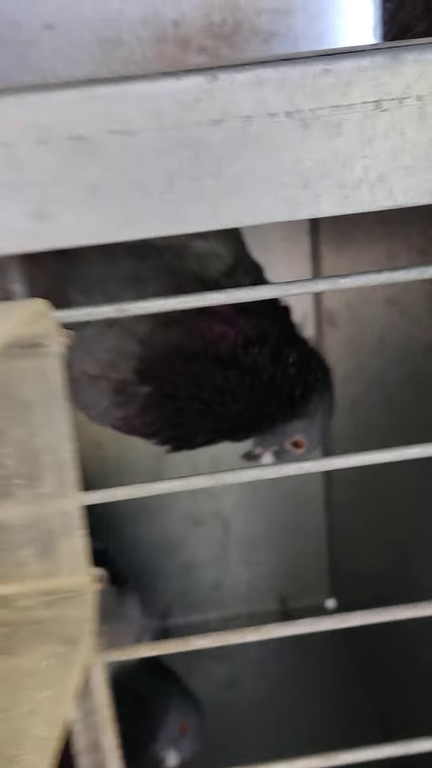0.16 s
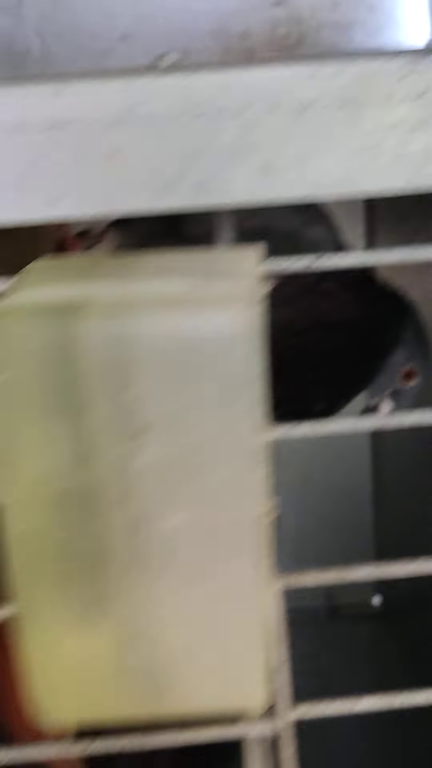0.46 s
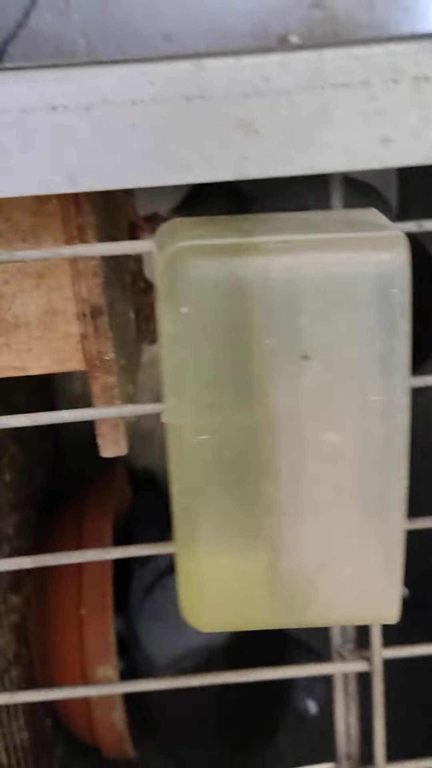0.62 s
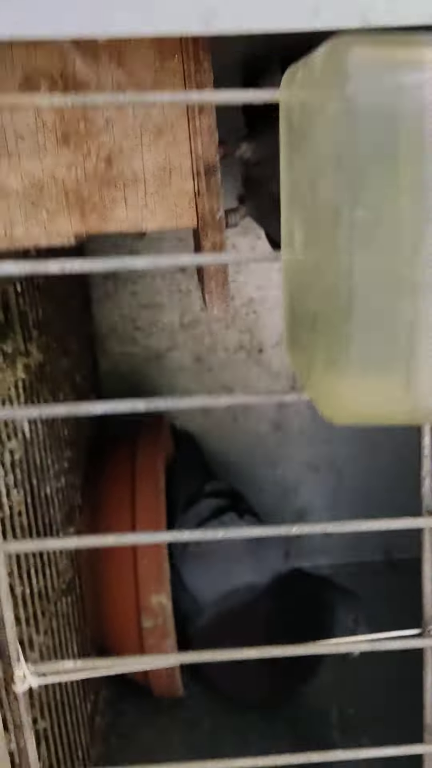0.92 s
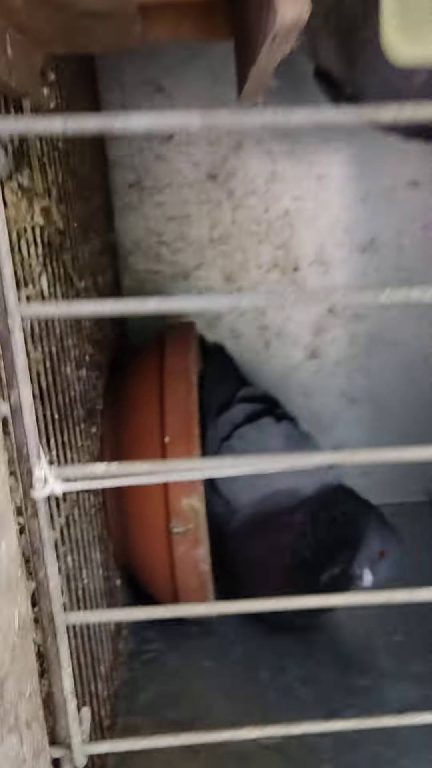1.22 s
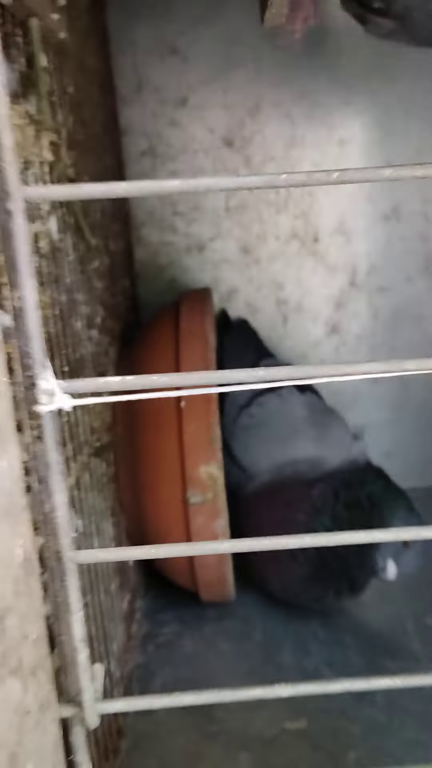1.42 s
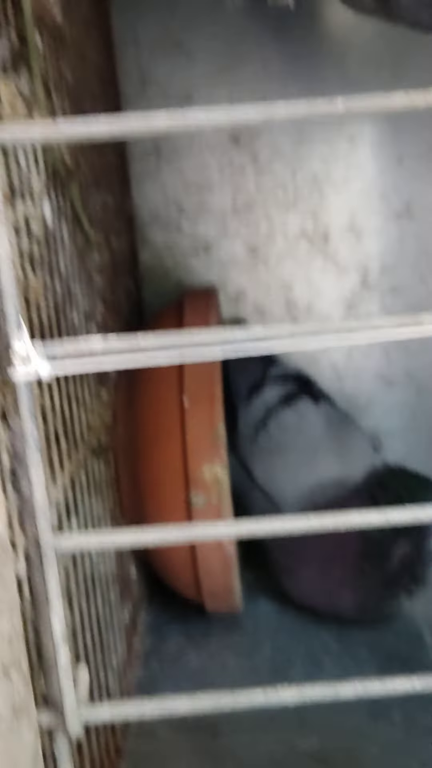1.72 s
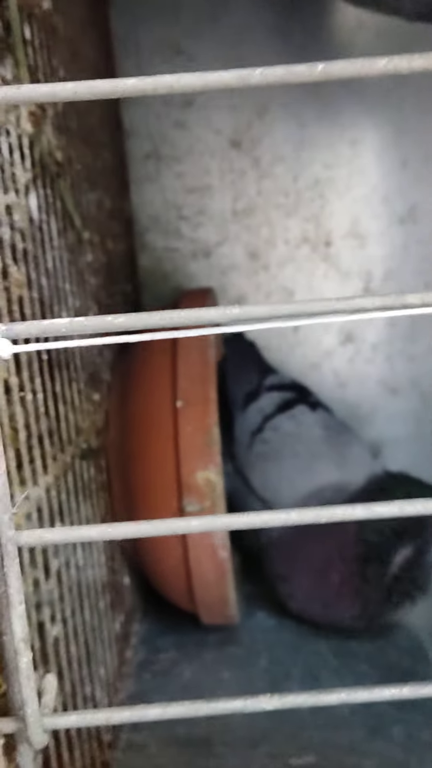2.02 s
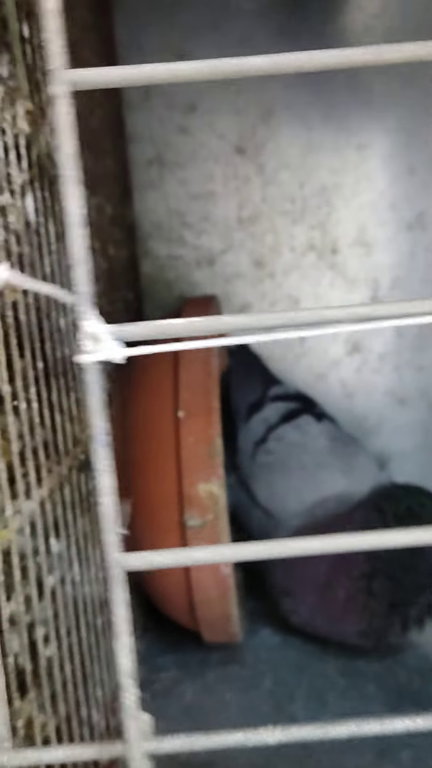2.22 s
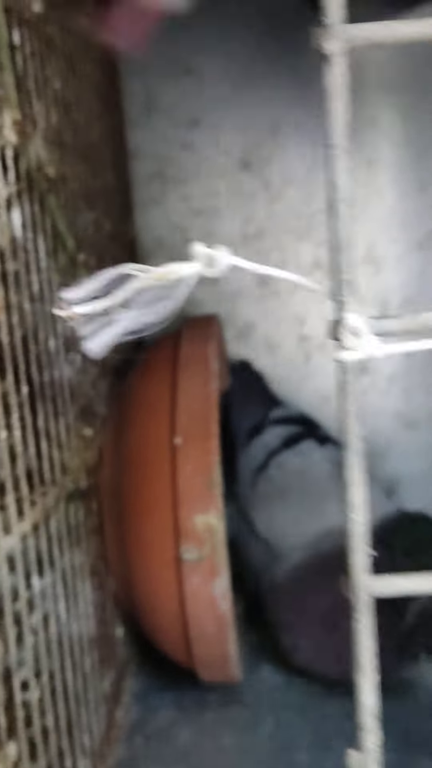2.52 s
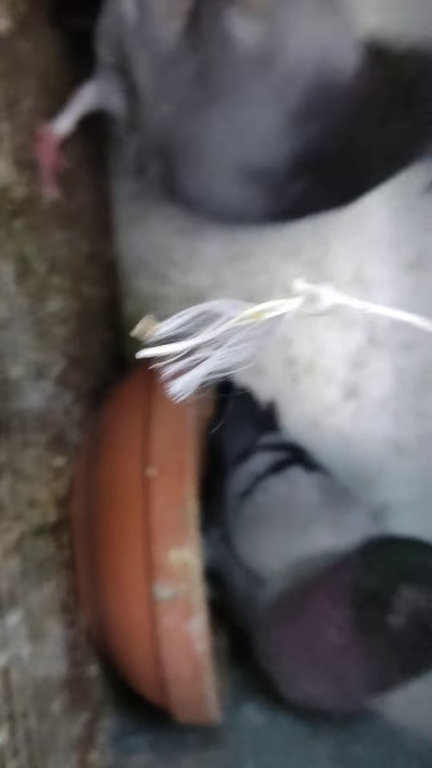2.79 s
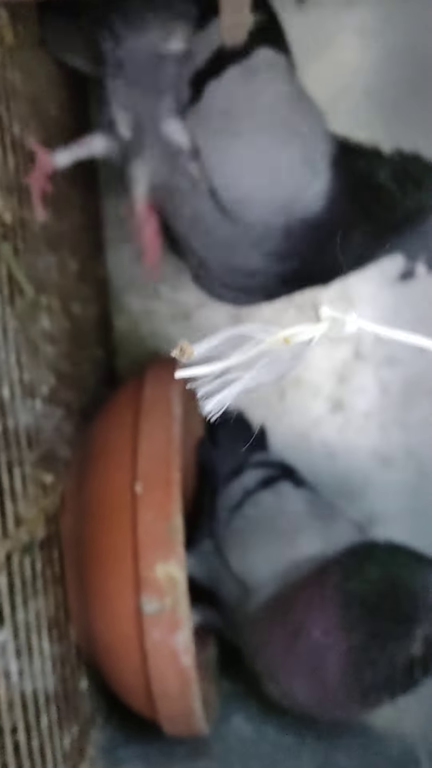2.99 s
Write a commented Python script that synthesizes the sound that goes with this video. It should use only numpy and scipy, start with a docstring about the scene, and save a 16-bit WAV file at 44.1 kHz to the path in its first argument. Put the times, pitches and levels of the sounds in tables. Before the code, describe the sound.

Pigeons coo in low, overlapping, throaty calls for the first 1.5 seconds, with faint falling chick squeaks behind them. From about 1.6 seconds feathers flick and rustle close by, growing louder and busier after 2.3 seconds, with two more short coos. Around 2.7 seconds come quick dry wing claps and a hollow thud on a wooden box, then a sharp tap at 3 seconds.

```python
"""Pigeons coo over each other in a small wooden loft while squabs squeak thinly behind them.
Then one bird flutters close to the wire front: feathers flick and scrape, feet knock,
the nest box booms and the wire rings faintly. Coos are near-sine tones from the swollen crop,
squeaks are falling whistles, feathers are bursts of shaped noise; box and wire resonate."""
import sys
import numpy as np
from scipy import signal
from scipy.fft import rfft, irfft
from scipy.io import wavfile

SR = 44100
rng = np.random.default_rng(int(sys.argv[2]) if len(sys.argv) > 2 else 0)


def wav_out(sig):
    """Save sig, one row per channel (or a flat mono array), as 16-bit PCM at SR to the path in sys.argv[1]."""
    wavfile.write(sys.argv[1], SR, np.round(np.clip(np.atleast_2d(sig).T, -1, 1) * 32767).astype(np.int16))


N = 138915
T = np.arange(N) / SR
BIN_HZ = np.arange(N // 2 + 1) * SR / N

LOFT_T60_S, LOFT_WET_DB = 0.31, -3.5
BOX_T60_S, BOX_WET_DB = 0.028, -3
# feather hiss spectrum (frequency [Hz], level [dB])
FEATHER_HISS = [(2500, -22.5), (4500, -7.5), (6500, -11), (7700, -4.5), (8650, 1.5), (9500, -4),
                (11800, -1.5), (14000, -15.5)]


def undb(db):
    """Decibels to gain."""
    return 10 ** (np.asarray(db) / 20)


def unit(x):
    """Scale to rms 1."""
    return x / np.sqrt(np.mean(x ** 2))


def curve(table, column=1):
    """Gain over time from one dB column."""
    rows = np.array(table)
    return undb(np.interp(T, rows[:, 0], rows[:, column]))


def noise(gain, channels=2):
    """Unit noise whose spectrum follows gain(Hz)."""
    white = rng.standard_normal((channels, N))
    return unit(irfft(rfft(white) * gain(BIN_HZ + 1e-6), N))


def coloured(points, crossfeed=0.065):
    """Partly shared stereo noise shaped by (frequency [Hz], level [dB]) points."""
    hz, db = np.array(points).T
    x = noise(lambda f: undb(np.interp(np.log(f), np.log(hz), db)))
    return unit(x + crossfeed * x[::-1])


def band(hz, half_width_hz):
    """Mono unit noise in one resonance."""
    return noise(lambda f: 1 / (1 + ((f - hz) / half_width_hz) ** 2), channels=1)[0]


def drift(hz):
    """Unit random wander up to a given rate."""
    return noise(lambda f: 1 / (1 + (f / hz) ** 4), channels=1)[0]


def phase_rad(hz):
    """Running phase of a varying frequency."""
    return 2 * np.pi * np.cumsum(hz) / SR


def throb(hz):
    """Unit oscillation whose rate wanders."""
    return unit(np.sin(phase_rad(hz * (1 + 0.2428 * drift(20.03)))))


def burst(start_s, rise_s, decay_s):
    """Linear rise, exponential fall."""
    age_s = T - start_s
    return np.clip(age_s / rise_s, 0, 1) * np.exp(-np.maximum(age_s - rise_s, 0) / decay_s)


def space(x, t60_s, wet_db):
    """Direct sound plus dense reflections after 2 ms, different at each ear."""
    t = T[:SR // 2]
    tail = rng.standard_normal((2, len(t))) * undb(-60 * t / t60_s) * (t > 0.002)
    tail /= np.sqrt(np.sum(tail ** 2, axis=1, keepdims=True))
    reflections = signal.fftconvolve(x, tail, axes=1)[:, :N]
    return (x + undb(wet_db) * reflections) / np.hypot(1, undb(wet_db))


def coos():
    """Near-sine tones from the swollen crop swell, waver and fade; rough ones roll and rasp."""
    # (start [s], length [s], first [Hz], middle [Hz], last [Hz], level [dB], roughness [0-1])
    calls = [(0.0, 0.24, 276, 284.7, 305.5, -40.5, 0), (0.224, .11, 296, 288.4, 247, -36, 0.48),
             (0.349, 0.14, 266, 278.5, 260, -38.5, 0.2), (0.534, .155, 389.8, 373.8, 361.6, -36, 0.21),
             (0.518, 0.17, 290, 277.8, 277, -41.5, 0.26), (0.689, 0.18, 435, 412.6, 395, -43.5, 0.1),
             (0.876, 0.19, 400, 406.3, 445, -40, 0.06), (0.997, 0.19, 445, 415.6, 398, -35, 0.3),
             (1.1, 0.26, 235, 314, 350.4, -34.5, 0.61), (1.228, 0.12, 440, 432.3, 407, -35.5, 0.48),
             (1.304, 0.18, 250, 251.5, 220, -38.5, 0.51), (1.338, 0.22, 385, 378, 298, -34, 0.67),
             (2.027, 0.08, 278, 299, 298, -37.5, 0), (2.347, 0.17, 272, 315.3, 308, -31.5, 0.26)]
    attack_s, release_s = 0.022, 0.018
    rasp_hz, rasp_depth = 104.7, 1.21
    trill_hz, trill_depth = 29, 0.35
    out = np.zeros(N)
    for start_s, length_s, first_hz, middle_hz, last_hz, db, rough in calls:
        u = np.clip((T - start_s) / length_s, 0, 1)
        hz = first_hz * (1 - u) * (1 - 2 * u) + middle_hz * 4 * u * (1 - u) + last_hz * u * (2 * u - 1)
        wobble = (0.02 + 0.12 * rough ** 2) * drift(39.4)
        phase = phase_rad(hz * (1 + wobble))
        voice = np.sin(phase) + undb(-11) * np.sin(2 * phase)
        voice += rough * rasp_depth * throb(rasp_hz) * np.sin(phase)
        voice *= 1 + rough * trill_depth * throb(trill_hz)
        swell = np.clip((T - start_s) / attack_s, 0, 1)
        fade = np.exp(-np.maximum(T - start_s - length_s + release_s, 0) / release_s)
        out += undb(db) * swell * fade * unit(voice)
    throat = signal.butter(5, [195, 590], "bandpass", fs=SR, output="sos")
    return space(signal.sosfilt(throat, out)[None], LOFT_T60_S, LOFT_WET_DB)


def far_coos(birds=8, centre_hz=310.4, level_db=-46.5):
    """Birds deeper in the loft blur into a wavering drone."""
    out = np.zeros(N)
    for _ in range(birds):
        hz = centre_hz * np.exp(0.28 * drift(2))
        out += drift(18.7) * np.sin(phase_rad(hz))
    return undb(level_db) * space(unit(out)[None], LOFT_T60_S, LOFT_WET_DB)


def loft_air(level_db=-47):
    """Soft air noise with a slight flicker."""
    # (frequency [Hz], level [dB])
    spectrum = [(25, -18.5), (450, 2.5), (750, -15.5), (1500, -23.5), (3800, -12.5), (7000, -25.5),
                (11000, -18.5), (14000, -32)]
    return undb(level_db) * coloured(spectrum) * undb(drift(17))


def hand_rumble():
    """Low rumble of a moving hand."""
    # (time [s], level [dB])
    levels = [(0, -53.5), (2.6, -50.5), (2.9, -42)]
    return curve(levels) * band(hz=40.4, half_width_hz=40)


def nest_box():
    """The box booms under the moving birds and thuds as one lands; beaks and feet tap the wood."""
    # (time [s], level [dB])
    boom_levels = [(0, -51), (1.2, -62), (1.8, -45.5), (2.05, -47), (2.23, -37), (2.65, -40), (2.85, -29.5),
                   (3.0, -36)]
    # pecks and foot taps (time [s], level [dB])
    knocks = [(0.059, -42), (0.534, -40), (1.367, -34.5), (3.025, -15)]
    landing_s, thud_hz, thud_db = 2.684, 146.6, -15
    boom = curve(boom_levels) * band(hz=145.2, half_width_hz=17)
    thud = undb(thud_db) * burst(landing_s, rise_s=0.0018, decay_s=0.018)
    thud *= np.sin(2 * np.pi * thud_hz * (T - landing_s))
    wood = band(hz=1750, half_width_hz=1000)
    taps = wood * sum(undb(db) * burst(at_s, rise_s=0.00025, decay_s=0.002) for at_s, db in knocks)
    return boom + thud + space(taps[None], t60_s=0.13, wet_db=BOX_WET_DB)


def squabs(fall_hz_per_s=3300, blur_hz=215):
    """Thin, hoarse whistles that fall in pitch."""
    # (start [s], length [s], first pitch [Hz], level [dB])
    squeaks = [(0.126, 0.15, 3890, -52), (0.396, 0.12, 4220, -52), (0.559, 0.37, 4110, -56),
               (0.714, 0.067, 4800, -51.5), (0.989, .18, 3860, -47.5), (1.529, 0.22, 3980, -50.5)]
    out = np.zeros(N)
    for start_s, length_s, first_hz, db in squeaks:
        u = np.clip((T - start_s) / length_s, 0, 1)
        hz = first_hz - fall_hz_per_s * length_s * u + blur_hz * drift(252)
        out += undb(db) * 2 * np.sin(np.pi * u) * np.sin(phase_rad(hz))
    return space(out[None], LOFT_T60_S, wet_db=1.5)


def swish(focus_hz, boost_db=6.5, width_hz=1000):
    """Feather hiss boosted around one frequency."""
    hz, db = np.array(FEATHER_HISS).T
    focus_db = boost_db * np.exp(-((BIN_HZ - focus_hz) / width_hz) ** 2)
    return noise(lambda f: undb(np.interp(f, hz, db) + focus_db))


def wire_ring(drive, hz=3192, t60_s=0.054):
    """The wire front rings faintly in one mode, driven by the wings."""
    t = T[:SR // 2]
    response = undb(-36.5 - 60 * t / t60_s) * np.sin(2 * np.pi * hz * t)
    return signal.fftconvolve(drive, response[None], axes=1)[:, :N]


def wings():
    """Feathers shuffle, brush and flick, each flick with its own brightness; wing tips clap drily."""
    # steady shuffling (time [s], treble [dB], body [dB])
    shuffle = [(0, -54.5, -67), (1.5, -49.5, -54.5), (1.7, -38.5, -54.5), (2.2, -46.5, -51),
               (2.28, -26.5, -34), (2.38, -33.5, -35.5), (2.5, -27, -29.5), (2.65, -32.5, -34),
               (2.87, -32, -35), (3.15, -39.5, -48)]
    # soft strokes (time [s], level [dB])
    brushes = [(0.326, -44), (0.565, -43.5), (0.74, -44), (0.816, -39.5), (1.006, -39), (1.259, -36.5),
               (1.969, -35.5)]
    # flicks and scrapes (time [s], decay [s], treble [dB], body [dB], focus [Hz])
    flicks = [(0.905, 0.03, -49, -44, 8700), (1.651, 0.0073, -26.5, -36.5, 8200),
              (1.722, 0.0045, -13.5, -32, 9700), (1.864, 0.015, -10, -25, 8540),
              (2.062, 0.0073, -29.5, -41.5, 7500), (2.157, 0.014, -20.5, -27, 6450),
              (2.311, 0.014, -14, -25.5, 10760), (2.41, 0.0095, -20.5, -50, 9050),
              (2.46, 0.021, -10.5, -42, 11000), (2.496, 0.013, -10.5, -30, 8900),
              (2.556, 0.0094, -14.5, -35.5, 10700), (2.605, 0.018, -18.5, -55, 8100),
              (2.754, 0.03, -15.5, -25, 10100), (2.833, 0.016, -24, -22, 11800)]
    # wing claps and sharp ticks (time [s], treble [dB], body [dB])
    tip_hits = [(1.55, -29, -30.5), (2.498, -13, -39), (2.6695, -5, -16), (2.679, -10, -18),
                (2.699, -8, -19), (2.72, -12.5, -29), (2.7334, -10.5, -30)]
    # woody body of the rustle (frequency [Hz], level [dB])
    body_spectrum = [(200, -11), (400, -1.5), (680, 1), (1000, -6), (2100, -4), (2700, -7.5), (4000, -7),
                     (7000, -62)]
    rise_s, clap_decay_s, flutter_db = 0.0018, 0.0019, 2.5
    linger = 1.7  # body decay / treble decay
    treble_gain = curve(shuffle, column=1) * undb(flutter_db * drift(11))
    body_gain = curve(shuffle, column=2) * undb(flutter_db * drift(11))
    for start_s, db in brushes:
        treble_gain = np.hypot(treble_gain, undb(db) * burst(start_s, 2 * rise_s, decay_s=0.038))
    rustle = treble_gain * coloured(FEATHER_HISS)
    for start_s, decay_s, treble_db, body_db, focus_hz in flicks:
        rustle += undb(treble_db) * burst(start_s, rise_s, decay_s) * swish(focus_hz)
        body_gain = np.hypot(body_gain, undb(body_db) * burst(start_s, rise_s, decay_s * linger))
    claps = np.zeros((2, N))
    tip_hiss = swish(focus_hz=8500)
    for start_s, treble_db, body_db in tip_hits:
        claps += undb(treble_db) * burst(start_s, rise_s, clap_decay_s) * tip_hiss
        body_gain = np.hypot(body_gain, undb(body_db) * burst(start_s, rise_s, clap_decay_s * linger))
    rustle += body_gain * coloured(body_spectrum)
    rustle *= unit(np.exp(0.32 * drift(810)))  # grain
    wire = wire_ring(rustle + claps)
    clap_pan = undb([[-0.5], [0.5]])
    return space(rustle + wire, BOX_T60_S, BOX_WET_DB) + clap_pan * claps


def scene():
    """All the birds in their loft."""
    return coos() + far_coos() + squabs() + wings() + nest_box() + loft_air() + hand_rumble()


def record(dry, top_hz=14350):
    """Two microphones favour different bands; full-scale clip, then a steep low-pass."""
    # microphone balance (frequency [Hz], left minus right [dB])
    balance = [(600, 0), (1100, 4.5), (2400, 5), (4300, -2), (9000, -3), (14000, 8)]
    hz, db = np.array(balance).T
    lean_db = np.interp(np.log(BIN_HZ + 1), np.log(hz), db)
    gains = undb([lean_db / 2, -lean_db / 2])
    gains /= np.sqrt(np.mean(gains ** 2, axis=0))
    heard = irfft(rfft(dry) * gains, N)
    lowpass = signal.ellip(10, 0.2, 95, top_hz, fs=SR, output="sos")
    return signal.sosfilt(lowpass, np.clip(heard, -1, 1))


dry = scene()
out = record(dry)
wav_out(out)
```